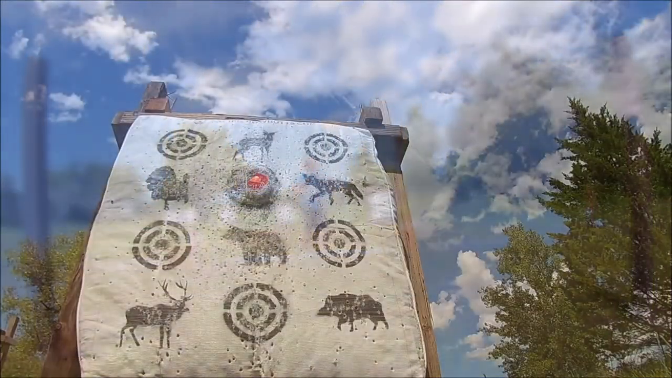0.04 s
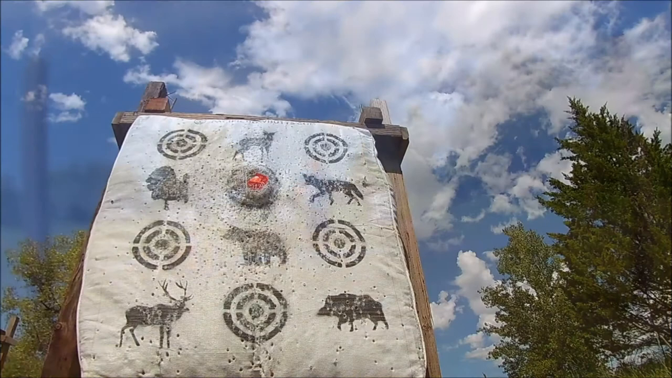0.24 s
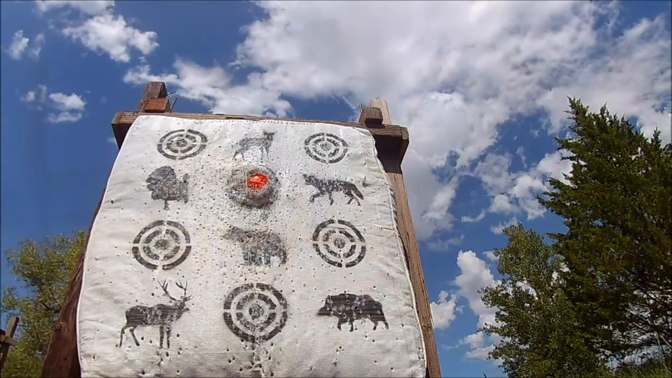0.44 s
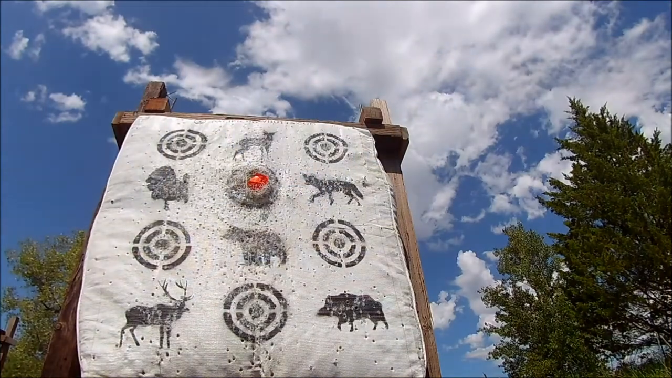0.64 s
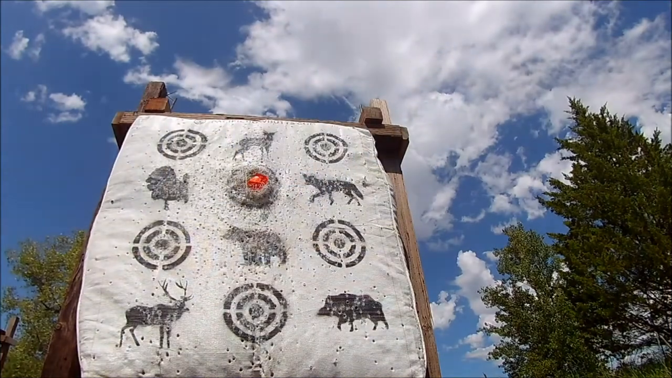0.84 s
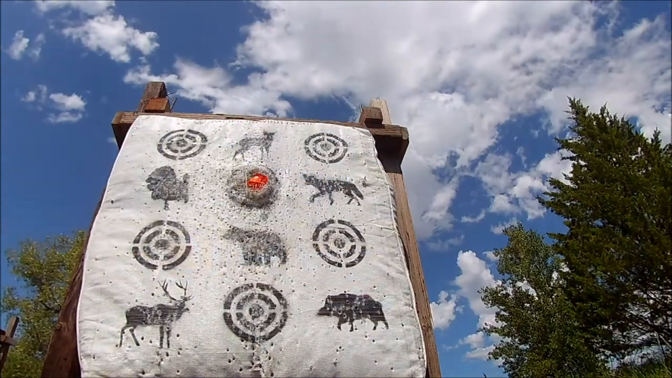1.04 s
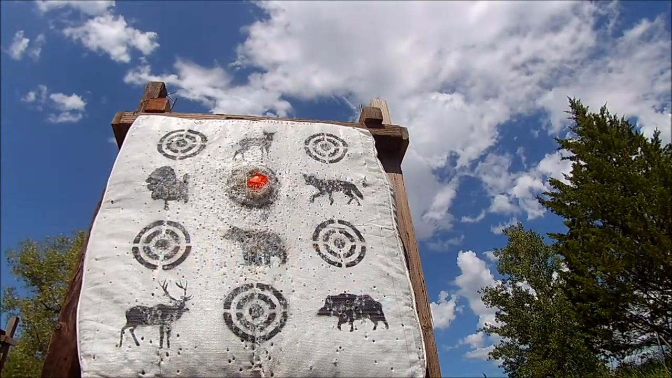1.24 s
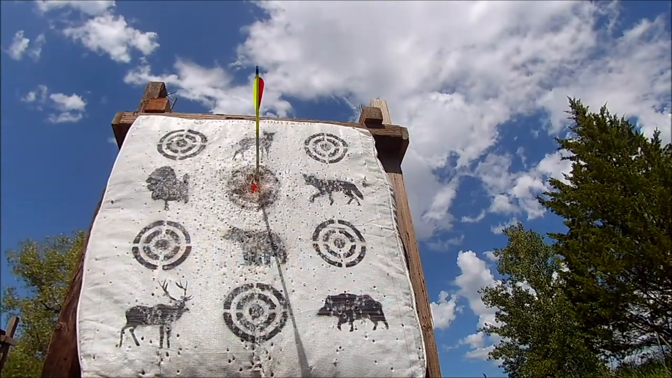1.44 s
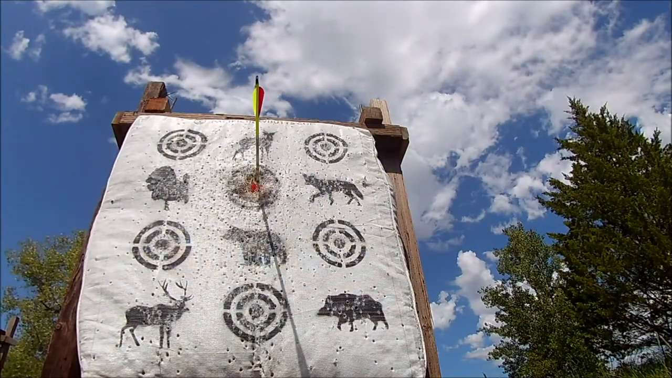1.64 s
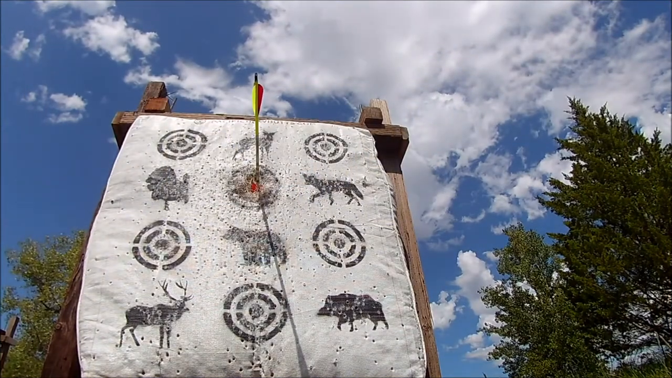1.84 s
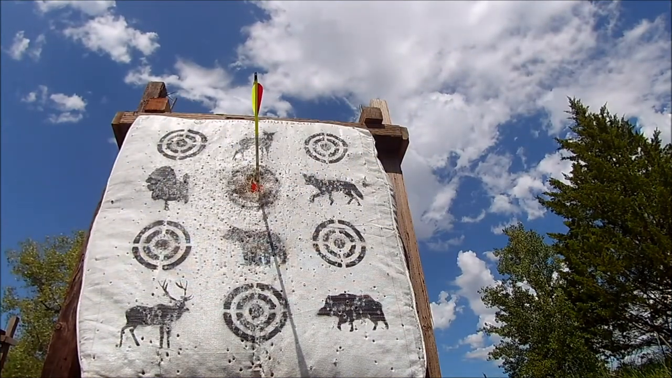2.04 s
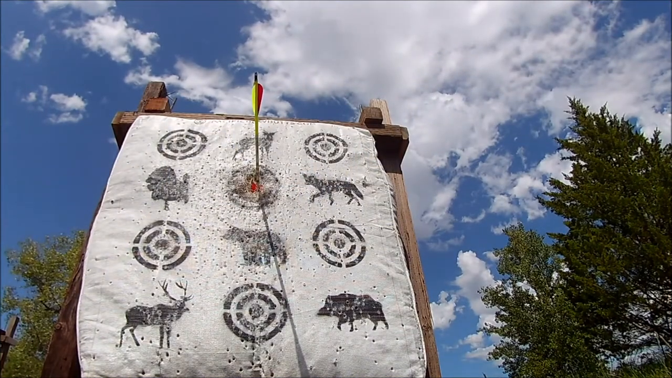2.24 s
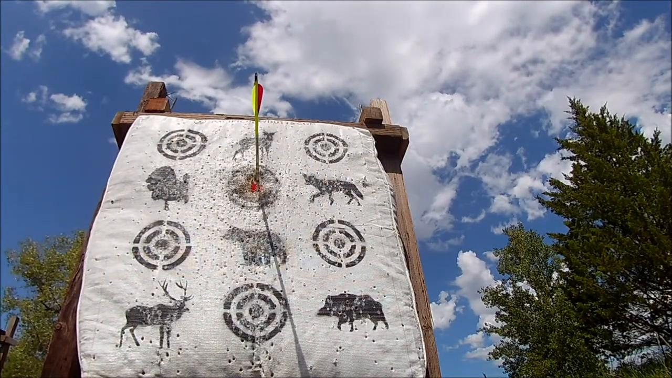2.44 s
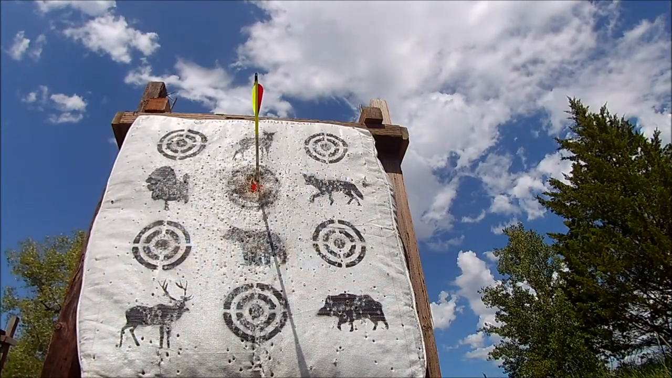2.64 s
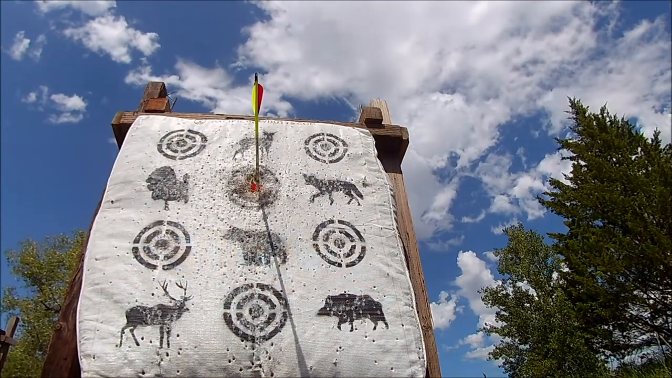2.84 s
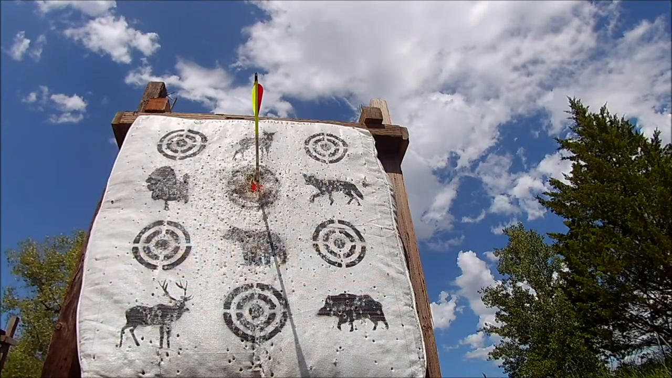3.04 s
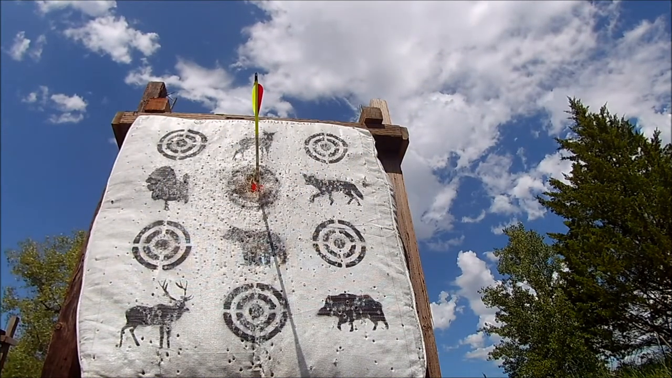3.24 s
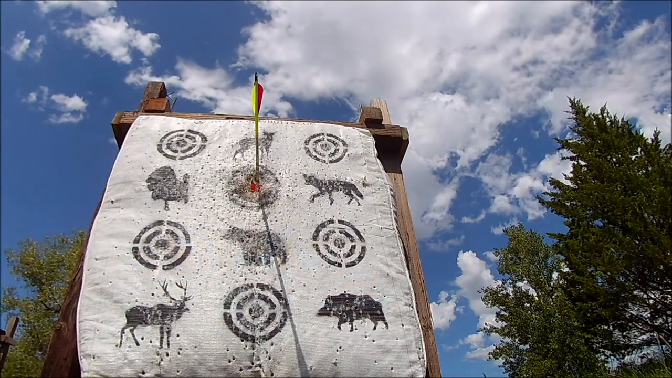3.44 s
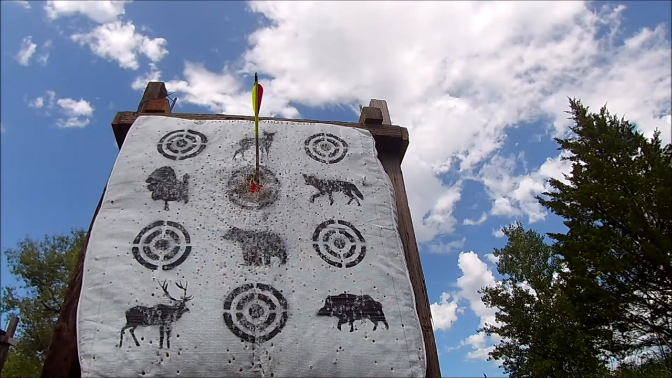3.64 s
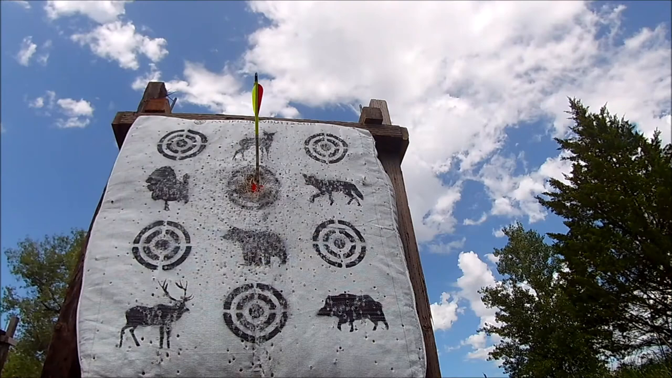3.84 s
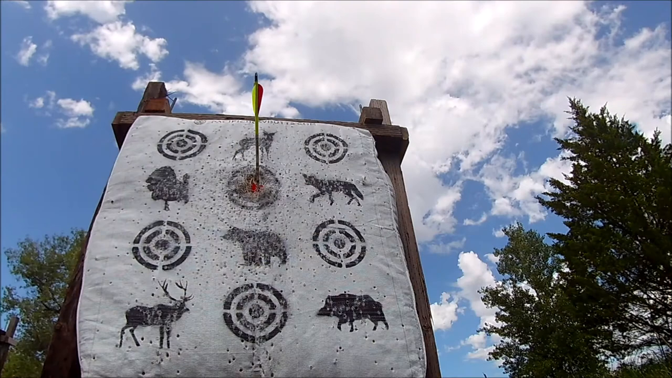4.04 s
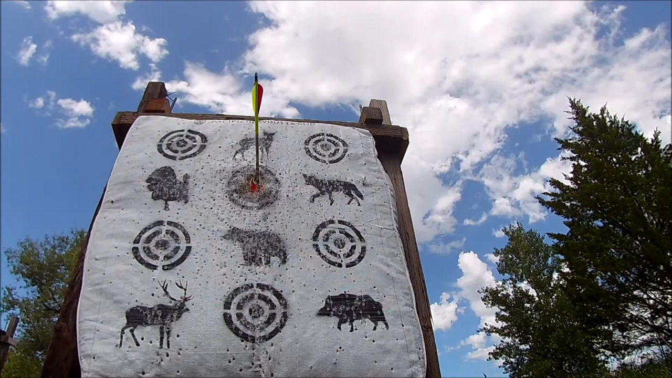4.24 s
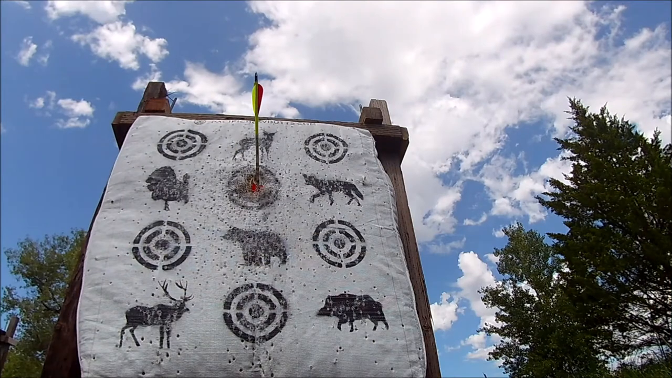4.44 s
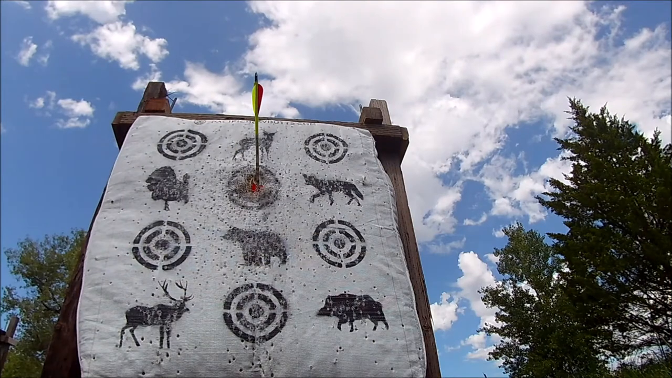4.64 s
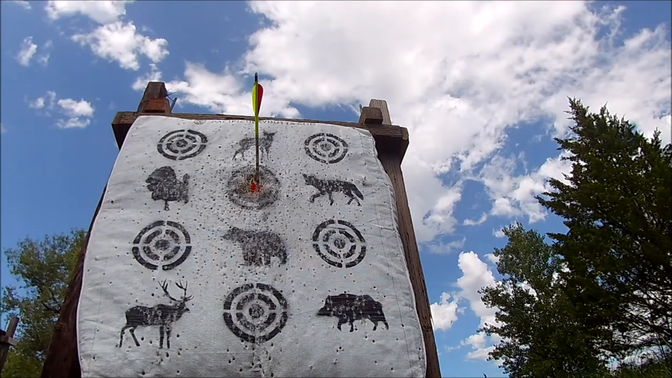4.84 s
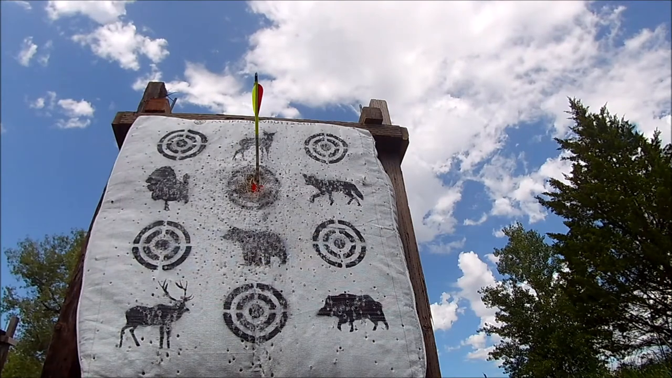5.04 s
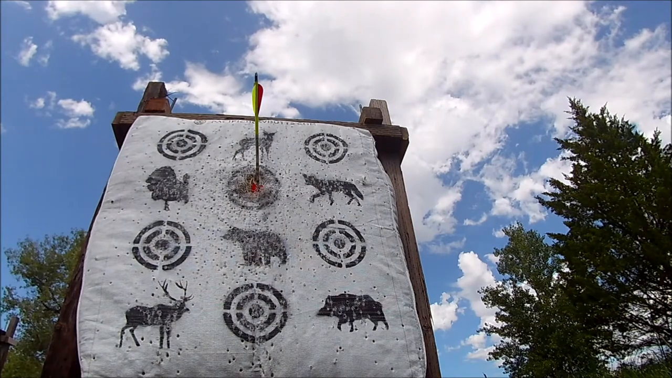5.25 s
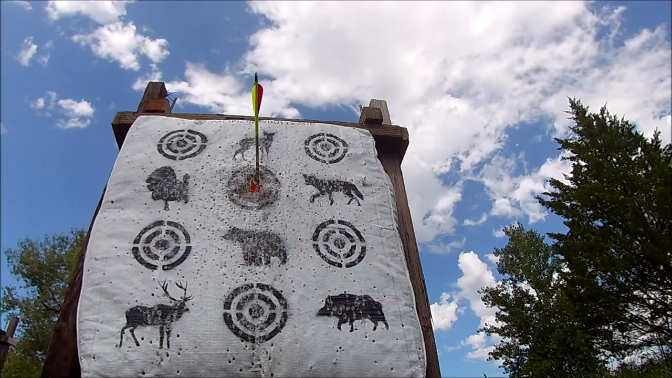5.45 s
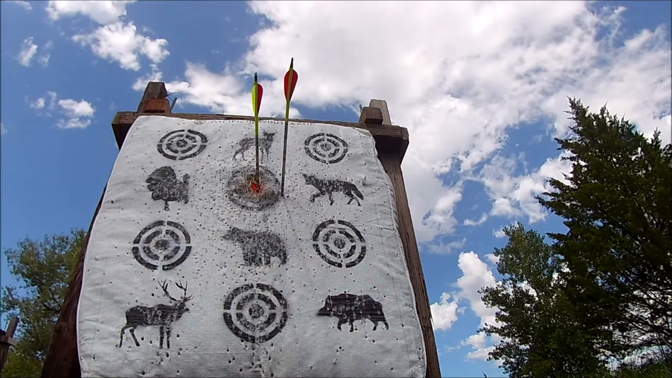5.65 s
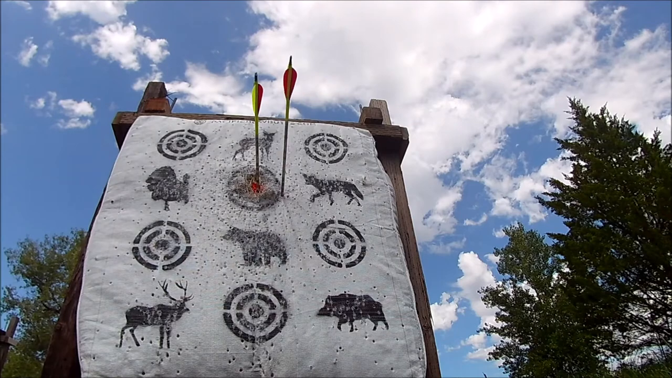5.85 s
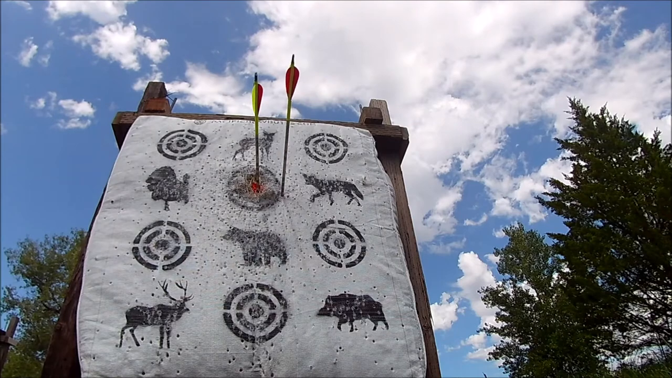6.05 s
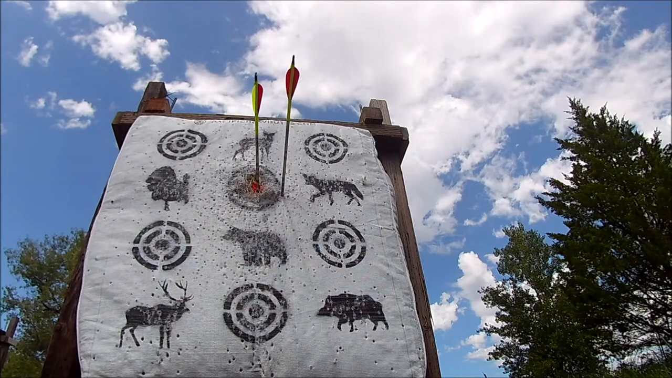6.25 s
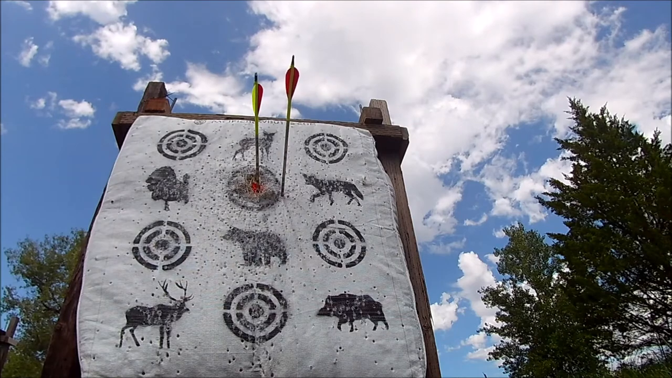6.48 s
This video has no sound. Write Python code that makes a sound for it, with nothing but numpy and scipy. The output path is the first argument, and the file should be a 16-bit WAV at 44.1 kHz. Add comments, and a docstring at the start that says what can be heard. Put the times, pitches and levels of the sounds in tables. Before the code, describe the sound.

Close microphone beside an archery target outdoors, bows far off. First comes a muted clack and thump with a faint string hum, then a raspy rush and an overloaded, very sharp thwack with knocking shaft. The breeze carries on with a tiny double tap and quiet arching chirps. A second, duller clack leads to a two-toned airy whistle dropping in pitch, then a heavy woody thwack with a clear outdoor echo.

```python
"""On an outdoor range, two arrows are shot from afar into a stuffed bag close to the microphone.
Each bow clacks and thumps as noise-smeared pulses, and its string hums as damped sines.
The first arrow hisses in as swelling noise; the second whistles on two tones that fall in pitch.
The bag cracks as a coloured pulse, tears as noise and booms as damped sines while the shaft jolts to rest.
A breeze of filtered noise, a small bird of arched sine notes and a faint far tap lie behind."""
import sys
import numpy as np
from scipy import signal
from scipy.fft import rfft, irfft
from scipy.io import wavfile

SR = 44100
rng = np.random.default_rng(int(sys.argv[2]) if len(sys.argv) > 2 else 0)


def dump(signal):
    """Clip the signal to [-1, 1] and save it as 16-bit WAV at the path in sys.argv[1]."""
    limited = np.clip(np.atleast_2d(signal).T, -1, 1)
    pcm = np.round(limited * 32767).astype(np.int16)
    wavfile.write(sys.argv[1], SR, pcm)


N = 287223  # length in samples

# the bow is loosed: t/s, level before the smear/dB, time between clacks/s, loss per clack/dB,
# dull above f/Hz, string hum level/dB
RELEASES = [(1.1472, -18.5, .0067, 5, 2294, -45), (5.2403, -18.5, .0062, 7.5, 1684, -47)]
# the point bursts through the cover: t/s, level/dB, lag of the bass/s, tearing level/dB, shaft slides for/s,
# shaft level/dB, boom level/dB, frame level/dB, echo level/dB
IMPACTS = [(1.4227, 7.5, .0014, -26, 0.049, -35.5, -20.5, -54, -32),
           (5.5151, 18.5, 0.0011, -22.5, 0.03, -43.5, -31.5, -37.5, -20)]
# colour of the stuffing as it tears, also of the arrow's wake: f/Hz, level/dB
TEARING_COLOUR = [(150, -8.5), (600, 7), (1400, -4), (2300, -14), (3200, -11), (4100, -14.5), (5000, -16),
                  (7500, -20), (9000, -36.5), (15000, -34)]
# colour of what the field sends back: f/Hz, level/dB
FIELD_COLOUR = [(60, -4.5), (200, -0.5), (600, -0.5), (1000, 0.5), (1550, -3), (2100, -12.5), (3500, -26),
                (6000, -40.5), (15000, -55)]


def gain_of(db):
    """Decibels to an amplitude factor."""
    return 10 ** (np.asarray(db) / 20)


def evened(x):
    """The same signal at rms 1."""
    return x / np.sqrt(np.mean(x ** 2) + 1e-20)


def read(points, hz):
    """A spectrum in dB, joined by straight lines over log frequency."""
    f, db = np.transpose(points)
    return np.interp(np.log(hz + 1), np.log(f + 1), db)


def add(mix, s, sound):
    """Mixes a sound in at time s, cut off at the end of the mix."""
    part = mix[round(s * SR):][:len(sound)]
    part += sound[:len(part)]


def noise(colour, size):
    """Noise of rms 1 with the given spectrum."""
    spectrum = rfft(rng.standard_normal(size))
    shape = gain_of(read(colour, np.fft.rfftfreq(size, 1 / SR)))
    return evened(irfft(spectrum * shape, size))


def click(colour, dull_hz=SR, lag=0, yield_hz=500, size=8192):
    """A minimum-phase pulse of energy 1, dulled above dull_hz; below yield_hz it comes up to lag seconds late."""
    hz = np.fft.fftfreq(size, 1 / SR)
    dulling = np.sqrt(1 + (hz / dull_hz) ** 4)
    log_gain = np.log(gain_of(read(colour, abs(hz))) / dulling)
    late = np.exp(-2j * np.pi * lag * yield_hz * np.arctan(hz / yield_hz))
    causal = np.exp(np.conj(signal.hilbert(log_gain)))  # the phase that puts the energy earliest
    pulse = np.fft.ifft(causal * late).real[:size // 2]
    return pulse / np.linalg.norm(pulse)


def ring(modes):
    """Damped sines of a struck body, each falling 60 dB in its t60."""
    t = np.arange(SR // 2) / SR
    return sum(gain_of(db - 60 * t / t60) * np.sin(2 * np.pi * hz * t) for hz, db, t60 in modes)


def scatter(colour, t60, rise):
    """A swelling, dying cloud of noise, of energy 1, as from many small reflections."""
    t = np.arange(SR // 2) / SR
    cloud = noise(colour, len(t)) * gain_of(-60 * t / t60) * (1 - np.exp(-t / rise))
    return cloud / np.linalg.norm(cloud)


def blows(rows, colour):
    """One pulse a row of time, level and treble limit: the softer the contact surface, the duller."""
    out = np.zeros(N)
    for s, db, dull_hz in rows:
        add(out, s, gain_of(db) * click(colour, dull_hz))
    return out


def breeze():
    """A low outdoor wash that swells a little and is combed by its bounce off the ground, over steady faint hiss."""
    # colour of the open air: f/Hz, level per Hz/dB
    air_colour = [(10, -28), (24, -13), (45, -1), (75, 4.5), (115, -5.5), (150, -7), (200, -5), (265, -11),
                  (330, -10.5), (420, -14), (600, -16.5), (1000, -23), (2000, -32.5), (4000, -41.5),
                  (6000, -49), (10000, -57), (15500, -58.5)]
    # slow course of the breeze: t/s, level/dB
    breeze_course = [(0, -55), (0.449, -55), (.7, -56.5), (3.5, -56), (3.8, -59), (6.5, -58)]
    wash = noise(air_colour, N)
    dulled = signal.butter(1, 1500, fs=SR, output="sos")
    bounce = signal.sosfilt(dulled, np.roll(wash, round(.0062 * SR)))
    wash = evened(wash + 0.24 * bounce)
    low = signal.sosfilt(signal.butter(1, 3000, fs=SR, output="sos"), wash)
    hiss = wash - low
    gusts = noise([(1, -1), (8, -7), (30, -35.5), (200, -100)], N)
    level_db = np.interp(np.arange(N) / SR, *np.transpose(breeze_course))
    return gain_of(level_db + 0.45 * gusts) * low + gain_of(-56.0) * hiss


def bird():
    """Short whistles that arch up in pitch and back, growing louder, with a scattered echo."""
    # bird notes: t/s, length/s, top f/Hz, level/dB
    bird_notes = [(2.749, .041, 2570, -63.5), (2.953, 0.044, 2700, -61.5), (3.132, .04, 1980, -60.5),
                  (3.14, .052, 2880, -67), (3.294, .054, 2010, -59.5), (3.43, .06, 2500, -64.5),
                  (5.114, 0.041, 2320, -68)]
    base_hz, swell_db = 1740, 13.5
    out = np.zeros(N)
    for s, length, top_hz, db in bird_notes:
        u = np.linspace(0, 1, round(length * SR))
        hz = base_hz + (top_hz - base_hz) * np.sin(np.pi * u)
        swell = signal.windows.tukey(len(u), .3) * gain_of(swell_db * (u - 1))
        add(out, s, gain_of(db) * swell * np.sin(2 * np.pi * np.cumsum(hz) / SR))
    echo = signal.fftconvolve(out, scatter(FIELD_COLOUR, t60=0.25, rise=0.0072))[:N]
    return out + gain_of(-18) * echo


def far_tap():
    """A faint far tap: two dull pulses in quick succession."""
    # contacts: t/s, level/dB, dull above f/Hz
    tap_contacts = [(2.3388, -30, 1100), (2.3456, -32.5, 1000)]
    # colour of the tap: f/Hz, level/dB
    tap_colour = [(150, -19), (520, 7), (1100, 0), (1500, -20), (4000, -23)]
    return blows(tap_contacts, tap_colour)


def bows(count=5):
    """Far clacks of limb and string, smeared by the bow's rattle and the surroundings, then the string's hum."""
    # colour of the clacks: f/Hz, level/dB
    bow_colour = [(30, -24), (70, -10.5), (160, 3.5), (400, 1), (750, 6), (1100, -2.5), (1480, 1),
                  (1750, -7), (2200, -5), (2700, -15.5), (3700, -12), (4800, -22.5), (15000, -31)]
    # the humming string: f/Hz, level/dB, t60/s
    string_modes = [(149, -10.5, .25), (339, -0.5, 0.35), (510, -10.5, 0.67), (930, -20, 0.21),
                    (1430, -16, .25)]
    first_clack_db = -4  # softer than the second
    uneven_s = .0003  # timing scatter, growing with each clack
    thump_db, thump_hz = -24, 220  # the limbs thump as the string stops
    hum_after_s = 0.025
    clacks, hum, k = np.zeros(N), np.zeros(N), np.arange(count)
    for s, db, gap, loss_db, dull_hz, hum_db in RELEASES:
        times = s + k * gap + uneven_s * k * rng.uniform(-1, 1, count)
        levels = db + np.where(k, -loss_db * (k - 1), first_clack_db)
        clacks += blows(zip(times, levels, [dull_hz] * count), bow_colour)
        add(clacks, s + gap, gain_of(thump_db) * click(bow_colour, thump_hz))
        add(hum, s + hum_after_s, gain_of(hum_db) * ring(string_modes))
    rattle = scatter([(100, 11.5), (1000, 0.0), (5000, -3.5)], t60=0.018, rise=0.0025)
    surroundings = scatter([(100, -0.5), (1000, -4.0), (5000, 3.0)], t60=0.36, rise=0.0052)
    smeared = signal.fftconvolve(clacks, .4 * rattle + .8 * surroundings)[:N]
    return hum + .65 * clacks + smeared


def approach(start, arrival):
    """A flight by sample: time, nearness (1 at the closest), cosine of path against line to the microphone."""
    miss_s = .024  # closest distance to the microphone, in seconds of flight
    t = np.arange(start, arrival, 1 / SR)
    distance = np.hypot(arrival - t, miss_s)
    return t, miss_s / distance, (arrival - t) / distance


def hissing_arrow():
    """Air over the fluttering vanes grows louder as the first arrow nears, and rasps as it sweeps past."""
    # colour of the air's rush: f/Hz, level/dB
    rush_colour = [(300, -32), (750, -12), (1000, 0), (1250, -8), (1420, 0), (1530, 4), (1680, -8.5),
                   (1900, -16.5), (3000, -19), (6000, -43.5)]
    # colour of its high hiss: f/Hz, level/dB
    hiss_colour = [(400, -15), (850, -2), (1300, -22), (2050, 4), (2400, -6.5), (3200, -8.5), (4200, -5.5),
                   (4900, -20), (7500, -26), (9000, -41), (15000, -44.5)]
    # the point and then the vanes sweep past the microphone: t/s, level/dB, t60/s
    sweeps_past = [(1.3903, -39, .07), (1.409, -35, .2)]
    hiss_db, falloff = -38, 1.85  # level when nearest, power of distance
    high_share = .25
    from_s, rise_s = 1.235, .08  # the hiss emerges partway through the flight
    flutter_db, flutter_hz = 2.5, 90  # roughness
    attack_s = 0.0014  # of each sweep
    out = np.zeros(N)
    arrival = IMPACTS[0][0]
    t, near, _ = approach(from_s, arrival)
    emerging = np.minimum((t - t[0]) / rise_s, 1)
    air = (1 - high_share) * noise(rush_colour, len(t)) + high_share * noise(hiss_colour, len(t))
    flutter_colour = [(flutter_hz / 2, -20), (flutter_hz, 0), (2 * flutter_hz, -20), (SR / 2, -200)]
    flutter = noise(flutter_colour, len(t))
    add(out, t[0], gain_of(hiss_db + flutter_db * flutter) * emerging * near ** falloff * air)
    for s, db, t60 in sweeps_past:
        age = np.arange(0, arrival - s, 1 / SR)
        envelope = gain_of(db - 60 * age / t60) * (1 - np.exp(-age / attack_s))
        add(out, s, envelope * noise(hiss_colour, len(age)))
    return out


def whistling_arrow():
    """Two tones swell as the second arrow nears, their Doppler pitch falling as it draws level; its wake rushes."""
    mach = .15  # speed as a share of the speed of sound
    high_hz, low_hz = 976, 577  # pitch when flying head-on
    high_db, high_falloff, high_beam = -29, 1.6, 4.4  # level before beaming, power of distance, beam ahead
    low_db, low_falloff = -42.5, 1.5  # the lower tone sounds all round
    wake_db, wake_falloff = -38, 3.9  # heard only at close range
    break_s, break_width_s = 5.334, 0.023  # both tones break off briefly
    out = np.zeros(N)
    t, near, head_on = approach(RELEASES[1][0], IMPACTS[1][0])
    doppler = (1 - mach) / (1 - mach * head_on)
    turns = 2 * np.pi * np.cumsum(doppler) / SR  # phase for 1 Hz
    high = gain_of(high_db) * near ** high_falloff * head_on ** high_beam * np.sin(high_hz * turns)
    low = gain_of(low_db) * near ** low_falloff * np.sin(low_hz * turns)
    sounding = 1 - np.exp(-((t - break_s) / break_width_s) ** 2)
    wake = gain_of(wake_db) * near ** wake_falloff * noise(TEARING_COLOUR, len(t))
    add(out, t[0], np.sqrt(2) * sounding * (high + low) + wake)  # root 2: tone levels are rms
    return out


def jolts(count=4):
    """The shaft jolts to rest in the stuffing: knocks at widening gaps, each softer and duller than the last."""
    # per hit: first gap/s, growth of the gaps, first level/dB, dull above f/Hz, share of that f left per jolt
    jolt_series = [(.0034, 1.93, .5, 2103, 0.4), (.0073, 1.4, -4.5, 1591, .25)]
    # colour of the knocks: f/Hz, level/dB
    knock_colour = [(20, -30.5), (80, -12), (160, 2), (300, 2), (1200, 3.5), (2000, -11), (4000, -36.5),
                    (10000, -53)]
    fade_db = 3  # times the square of the jolt's number
    out, k = np.zeros(N), np.arange(count)
    for (s, *_), (gap, growth, db, dull_hz, treble_left) in zip(IMPACTS, jolt_series):
        times = s + np.cumsum(gap * growth ** k)
        rows = zip(times, db - fade_db * k ** 2, dull_hz * treble_left ** k)
        out += blows(rows, knock_colour)
    return out


def target():
    """The cover cracks, the stuffing yields and tears, the shaft rings, bag and frame boom, and the field answers."""
    # colour of the crack, one list per hit: f/Hz, level/dB
    crack_colours = [
        [(30, -13.5), (90, -15), (170, -3), (310, 1.5), (600, 1.5), (950, -6), (1450, -1), (1800, -1.5),
         (2200, -33.5), (2800, -9), (4200, -15.5), (4900, -65.5), (7000, -43), (9000, -78), (15000, -57.5)],
        [(30, -24.5), (90, -17.5), (190, 5), (330, 8), (500, 0.5), (720, 7), (950, -5), (1400, 6), (1850, -5.5),
         (2300, -18), (3600, -25), (5200, -42), (8000, -46), (15000, -78)],
    ]
    # ringing shaft: f/Hz, level/dB, t60/s
    shaft_modes = [(3840, -3.5, 0.041), (3950, -4, 0.065), (4090, 1, 0.046)]
    # booming bag: f/Hz, level/dB, t60/s
    bag_modes = [(154, -2, .13), (246, -6, 0.14), (278, -4.5, 0.11)]
    # booming frame: f/Hz, level/dB, t60/s
    frame_modes = [(149, 1.5, .35), (254, -11.5, .2)]
    # the whole bag heaves: f/Hz, level/dB, t60/s
    sag_modes = [(42, -38.5, 0.24), (92, -40.5, 0.29)]
    out, t = np.zeros(N), np.arange(SR // 4) / SR
    for impact, colour in zip(IMPACTS, crack_colours):
        s, db, lag, tear_db, slide, shaft_db, boom_db, frame_db, echo_db = impact
        add(out, s, gain_of(db) * click(colour, lag=lag, yield_hz=510.0))
        sliding = gain_of(-60 * t / 0.06) / (1 + (t / slide) ** 8)  # friction ends when the shaft stops
        add(out, s, gain_of(tear_db) * noise(TEARING_COLOUR, len(t)) * sliding)
        add(out, s + 0.0034, gain_of(shaft_db) * ring(shaft_modes))
        add(out, s + 0.005, gain_of(boom_db) * ring(bag_modes) + gain_of(frame_db) * ring(frame_modes))
        add(out, s + 0.0071, ring(sag_modes))
        add(out, s + .012, gain_of(echo_db) * scatter(FIELD_COLOUR, t60=0.32, rise=.03))
    return out


def scene():
    """Everything as one microphone beside the target hears it."""
    background = breeze() + bird() + far_tap()
    arrows = bows() + hissing_arrow() + whistling_arrow() + jolts() + target()
    return (background + arrows)[None]


def record(dry):
    """Peaks beyond the ceiling overload the recorder, with rounded corners; then the band limit."""
    ceiling, edge_hz = .92, 15800
    excess = dry - np.clip(dry, -ceiling, ceiling)
    rounding = signal.firwin(11, 7000, fs=SR)
    clipped = dry - signal.oaconvolve(excess, rounding[None], "same")
    band_limit = signal.firwin(255, edge_hz, window=("kaiser", 9), fs=SR)
    return signal.oaconvolve(clipped, band_limit[None], "same")


dry = scene()
out = record(dry)
dump(out)
```